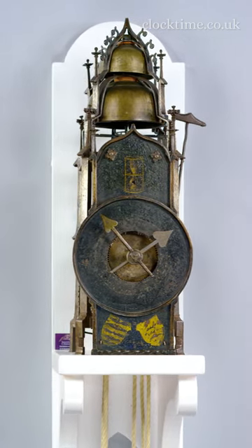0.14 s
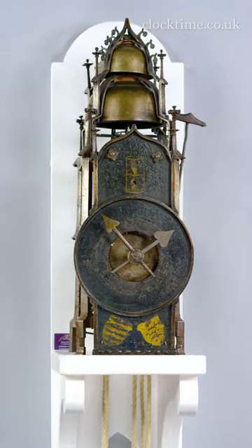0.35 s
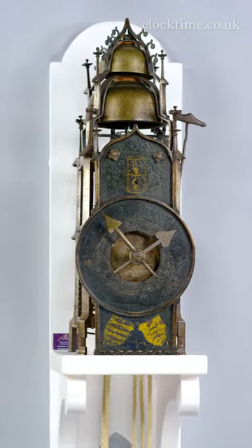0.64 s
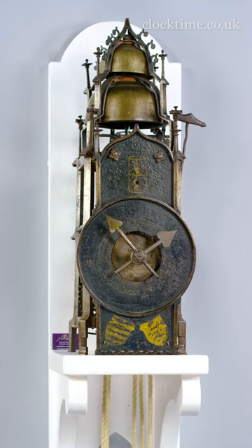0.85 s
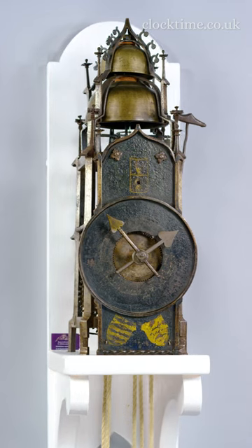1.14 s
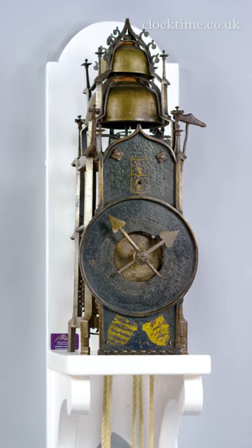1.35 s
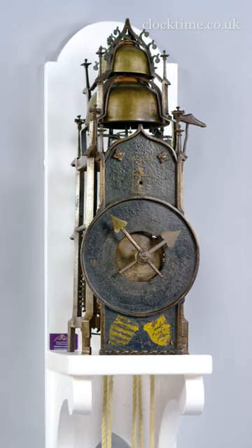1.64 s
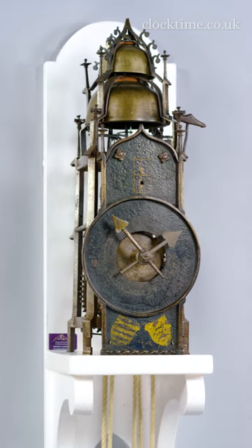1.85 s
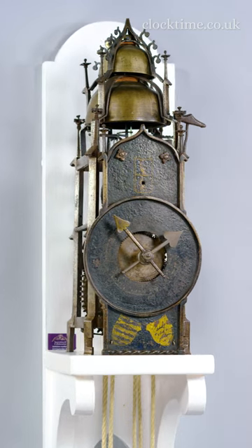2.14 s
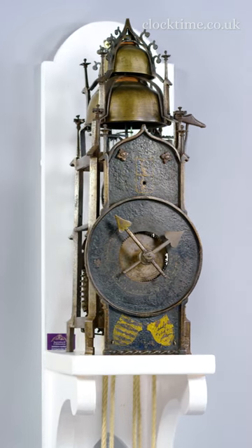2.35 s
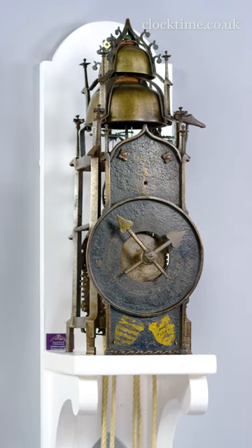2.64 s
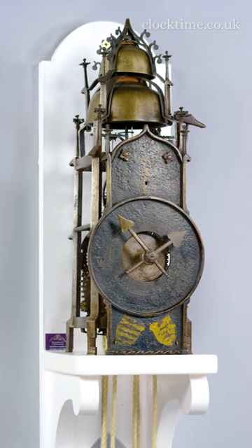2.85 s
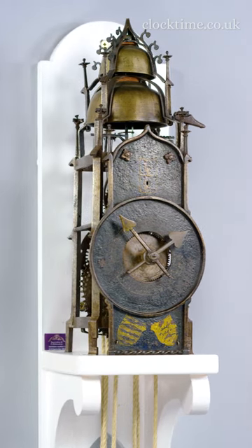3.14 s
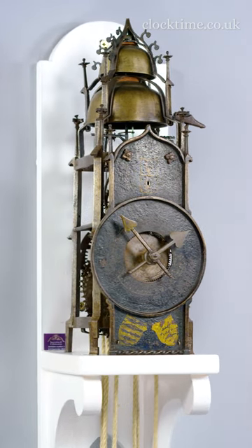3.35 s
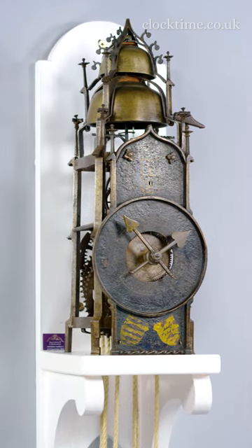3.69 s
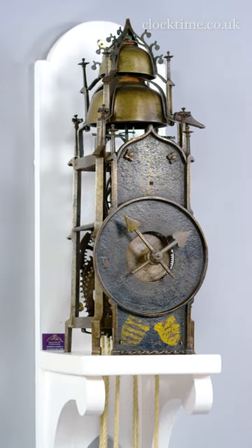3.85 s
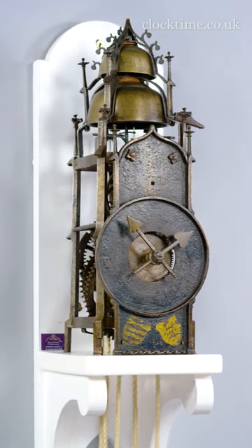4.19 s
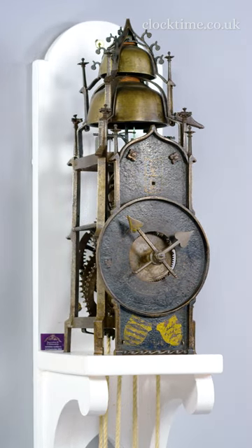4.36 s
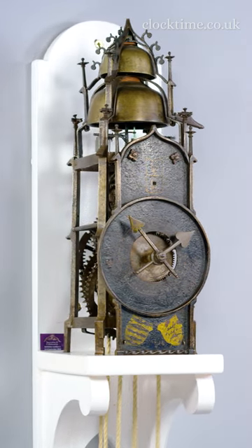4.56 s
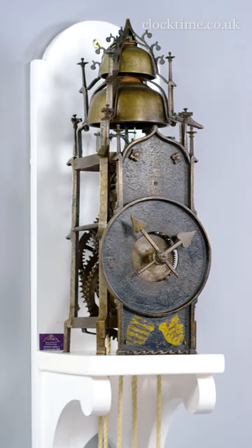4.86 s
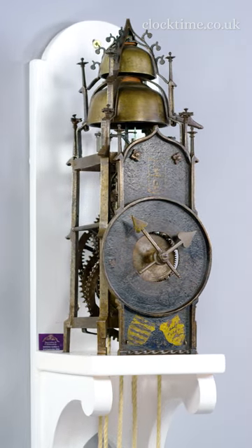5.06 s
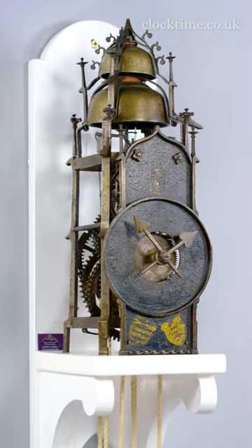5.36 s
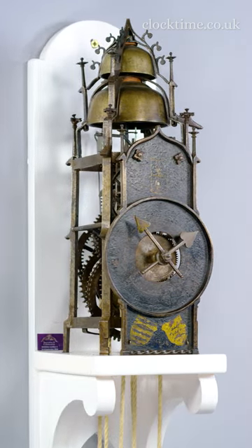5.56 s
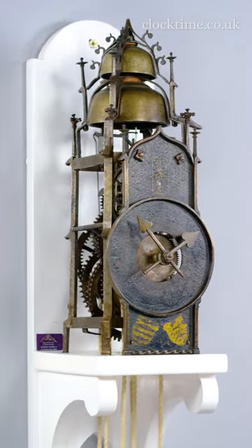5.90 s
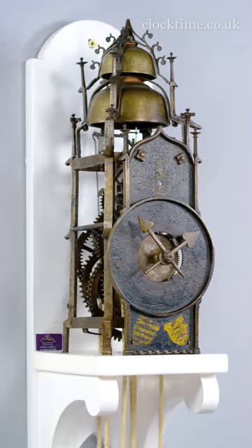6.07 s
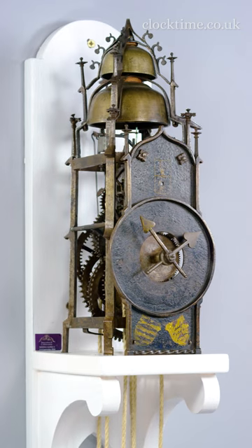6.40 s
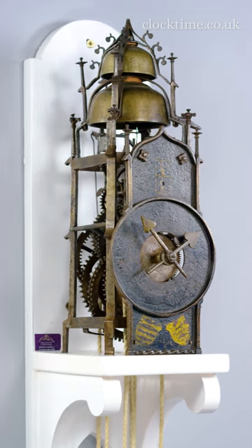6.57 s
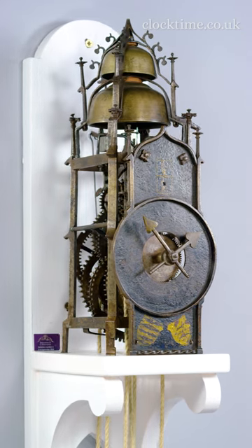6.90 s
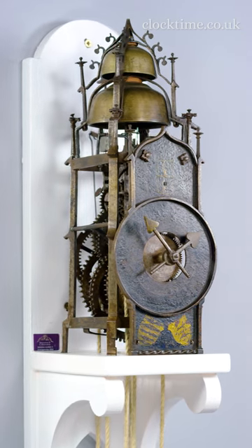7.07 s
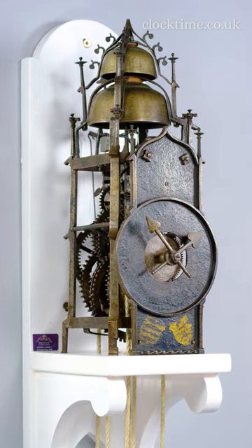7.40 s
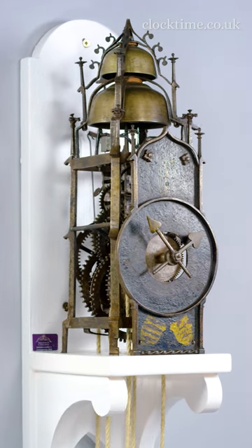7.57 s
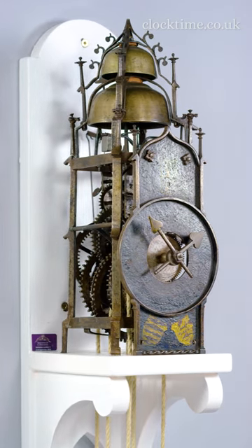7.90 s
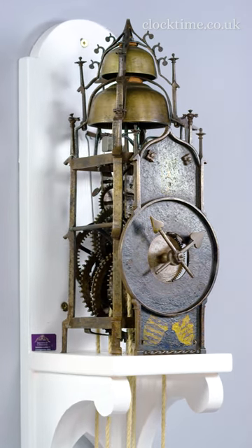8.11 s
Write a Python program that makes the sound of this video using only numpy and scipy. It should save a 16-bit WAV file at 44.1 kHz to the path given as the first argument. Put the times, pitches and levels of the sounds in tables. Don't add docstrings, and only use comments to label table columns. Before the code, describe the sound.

Crisp, bright clock ticks with tiny iron rattles and a soft wooden thud, one per second, over faint fan whine and distant low rumble.

```python
import sys
import numpy as np
from scipy import signal
from scipy.fft import rfft, irfft
from scipy.io import wavfile
from scipy.ndimage import uniform_filter1d

SR = 44100
rng = np.random.default_rng(int(sys.argv[2]) if len(sys.argv) > 2 else 0)


def int16_out(signal):
    q = np.round(np.clip(np.atleast_2d(signal).T, -1, 1) * 32767)
    wavfile.write(sys.argv[1], SR, q.astype(np.int16))


def level_to_linear(level):
    exponent = np.asarray(level, float) / 20
    return 10 ** exponent


N = 363384

# start in seconds, peak in dB, ring of the struck part in Hz, chatter in # ms.
DROPS = [(0.1382, -12, 10000, 5.0), (0.1452, -4, 13900, 6.2), (1.096, -16, 13700, 5.0),
         (1.1029, -23, 10000, 3.6), (2.2716, -17.5, 14800, 3.7), (2.2788, -8.5, 5600, 5.7),
         (2.3051, -20, 14700, 5.0), (3.2267, -13.5, 6630, 7.1), (3.2315, -17.5, 8280, 5.0),
         (4.2334, -15, 10820, 5.5), (4.2404, -10, 10400, 5.7), (5.1471, -13, 9900, 10.2),
         (6.1479, -18.5, 9800, 4.2), (6.1539, -17, 7490, 9), (6.1744, -25.5, 9950, 9),
         (7.1849, -8.5, 7800, 5.0), (7.197, -12, 9940, 2.7), (8.1784, -18.5, 10570, 5.0),
         (8.1829, -14.5, 8856, 5.0), (8.2106, -22, 9750, 5.6)]
# start in seconds, peak in dB, ring of the struck part in Hz.
GRAZES = [
    (1.0933, -25.5, 9020),
    (3.2259, -18.5, 7040),
    (5.1483, -16.5, 6040),
    (7.1839, -10.5, 7570),
]
# start in seconds, shove on the wall in dB, shove on
# the shelf in dB, then how well the knocks of that tick reach the wood in dB and the frame in dB.
PUSH = [(.157, -41, -27, -24, -33), (1.12, -33.5, -58, -30.5, -28.5), (2.287, -32.5, -26.5, -25.5, -31.5),
        (3.244, -38.5, -48.5, -25.5, -28.5), (4.254, -35.5, -23.5, -28, -31.5),
        (5.157, -32.5, -46, -25, -26), (6.182, -35.5, -28.5, -25.5, -31), (7.199, -32.5, -31, -33.5, -32),
        (8.195, -43, -26, -26.5, -32)]
# mode in Hz, level in dB, t60 in seconds.
BRACKET = [(81, 4, 0.21), (92.45, -8.5, 0.19), (156.3, -2, 0.23), (227.4, -1, 0.16), (263.2, 2, 0.2),
           (342.6, -6, 0.11), (395, -5.5, 0.2), (445, -10, .15), (558.7, -5.5, 0.091), (617, -12.5, 0.079),
           (727, -8, 0.1), (830, -18.5, 0.12), (900, -15.5, 0.054)]
SUPPORT_HZ = [85, 150, 250, 600, 1500]


def evened(x):
    return x / np.sqrt(np.mean(x ** 2) + 1e-20)


def read(points, hz):
    f, value = np.transpose(points)
    return np.interp(np.log(hz + 1), np.log(f + 1), value)


def add(mix, s, sound):
    part = mix[round(s * SR):][:len(sound)]
    part += sound[:len(part)]


def coloured(noise, points):
    hz = np.fft.rfftfreq(len(noise), 1 / SR)
    return irfft(rfft(noise) * level_to_linear(read(points, hz)), len(noise))


def ring(hz, db, t60, t, phase=0):
    hz, db, t60, phase = (np.reshape(v, (-1, 1)) for v in (hz, db, t60, phase))
    modes = level_to_linear(db - 60 * t / t60) * np.sin(2 * np.pi * (hz * t + phase))
    return modes.sum(0)


def metal(modes, t):
    damping, spread_db = 2.8, 3
    hz, width, db = np.transpose(modes)
    detune, luck = rng.standard_normal((2, len(hz)))
    short = t[:len(t) // 4]
    sound = ring(hz * (1 + .008 * detune), db + spread_db * luck, 2.2 / (damping * width), short)
    return np.pad(sound, (0, len(t) - len(short)))


def rattle(chatter_ms):
    knocks = rng.uniform(-1, 1, 1500) * (rng.random(1500) < .16)
    late = np.maximum(np.arange(1500) / SR - .0006, 0)
    onset = 1 - np.exp(-(late / .0004) ** 2)
    knocks *= onset * np.exp(-(late * 1000 / np.clip(chatter_ms, .3, 12)) ** 2.2)
    z = rfft(knocks)
    level = np.sqrt(uniform_filter1d(abs(z) ** 2, size=25) + 1e-12)
    return irfft(z / level, 1500) * (np.arange(1500) < 1200)


def driven(sounds, knocks):
    return signal.fftconvolve(sounds, knocks[None], axes=1)[:, :len(sounds[0])]


def iron_tick(peak_db, own_hz, knocks, lower, t):
    # mode in Hz, width in Hz, level in dB.
    iron_modes = [(5260, 100, -2), (5660, 77, -11), (6840, 150, -23.5), (7390, 69, -13), (7400, 78, -6),
                  (8110, 69, -18), (8460, 59, -14), (9170, 86, -12.5), (9750, 37, -1.5), (10400, 42, 2.5),
                  (10984, 200, -18), (11800, 340, 4.5), (13600, 140, -30.5), (13900, 60, -4.5),
                  (14100, 80, 2.5), (14700, 48, -8.5)]
    # frequency in Hz, level in dB per Hz.
    crack_colour = [(350, -62), (600, -10.5), (1440, -13.5), (3710, -8), (4210, -44), (5560, 4), (10100, 4),
                    (12600, 2.5), (13700, 2), (15800, -17), (16700, -41.5)]
    crack = evened(coloured(rng.standard_normal(len(t)), crack_colour))
    crack *= np.exp(-t / 0.00066) + 0.19 * np.exp(-t / 0.0064)
    own_db = 1.5 + max(peak_db + 9, 0)
    parts = metal(iron_modes, t) + ring(own_hz, own_db, .018, t)
    pair = driven([level_to_linear(10.0) * crack, parts], knocks)
    pair = signal.sosfilt(signal.butter(4, 4000, "high", fs=SR, output="sos"), pair)
    crack, parts = (coloured(v, [(9000, 0), (14000, -4.0 * lower)]) for v in pair)
    gain = level_to_linear(peak_db) / abs(crack + parts).max()
    return gain * parts, gain * crack


def frame_ring(frame_db, knocks, lower, share, t):
    # mode in Hz, width in Hz, level in dB.
    frame_modes = [(1216, 33, -8.5), (1780, 32, -24), (1990, 31, -9.5), (2110, 20, -0.5), (2230, 340, 5),
                   (2610, 35, -12.5), (3191, 44, -18.5), (3380, 190, 9.5), (3760, 80, 13), (4080, 56, -12),
                   (4460, 41, 6), (4766, 16, -14.5)]
    # mode in Hz, level in dB, t60 in seconds.
    pallet_modes = [
        [(2968, 9.5, 0.059), (3355, 5, 0.037)],
        [(3690, 11.5, 0.03), (2397, 0, 0.061)],
    ]
    # frequency in Hz, level in dB per Hz.
    wash_colour = [(400, -28), (800, -4.5), (1500, -2), (2400, 0), (3600, -3), (4300, -14.5), (5200, -3),
                   (7000, -21)]
    wash = coloured(coloured(rng.standard_normal(len(t)), wash_colour), share)
    wash = level_to_linear(13.5) * evened(wash) * (np.exp(-t / 0.0029) + .1 * np.exp(-t / 0.042))
    frame = metal(frame_modes, t) + ring(*np.transpose(pallet_modes[lower]), t)
    wake = 1 - np.exp(-(t / .0014) ** 2)
    wash, frame = driven([wash * wake, frame * wake], knocks)
    gain = level_to_linear(frame_db + 8.5) / abs(wash + frame).max()
    return gain * frame, gain * wash


def reach_db(s, peak_db, tick_db, follow, touch_db, seating_s):
    first = min(row[0] for row in DROPS + GRAZES if abs(row[0] - s) < .3)
    return tick_db + follow * (peak_db + 15.5) + touch_db * np.exp(-(s - first) / seating_s)


def wood_modes(db, t, wake_turns):
    hz, _, t60 = np.transpose(BRACKET)
    phase = .06 * rng.standard_normal(len(hz))
    out = np.zeros(len(t))
    for f, level, decay, turn in zip(hz, db, t60, phase):
        out += (1 - np.exp(-t * f / wake_turns)) * ring(f, level, decay, t, turn)
    return out


def contact(s, peak_db, own_hz, chatter_ms):
    # posts in dB, plate in dB.
    rap_colour = [
        (4, -0.5),
        (8.5, 5.5),
    ]
    t = np.arange(round(.3 * SR)) / SR
    tick = np.argmin([abs(row[0] - s) for row in PUSH])
    lower = tick % 2
    share = list(zip([*SUPPORT_HZ, 2600], [-9.0, -7.0, -5.0, *rap_colour[lower], 0]))
    rap_db = reach_db(s, peak_db, PUSH[tick][3], follow=.6, touch_db=-12.5, seating_s=.005)
    frame_db = reach_db(s, peak_db, PUSH[tick][4], follow=0.96, touch_db=-9, seating_s=.004)
    knocks = rattle(chatter_ms)
    parts, crack = iron_tick(peak_db, own_hz, knocks, lower, t)
    frame, wash = frame_ring(frame_db, knocks, lower, share, t)
    hz, db, _ = np.transpose(BRACKET)
    rap = wood_modes(rap_db - 6.0 + db + read(share, hz), t, wake_turns=.9)
    return parts + frame, crack + wash, rap


def contacts():
    # start in seconds, peak in dB, ring of the struck part in Hz.
    bounces = [(0.1654, -19.5, 8600), (0.1698, -19, 8440), (0.1892, -36, 13900), (1.1232, -28.5, 6300),
               (1.1352, -35, 10200), (2.2961, -23, 6180), (2.3109, -26, 14700), (2.3212, -42, 10300),
               (2.3269, -33, 10300), (3.2434, -28.5, 8630), (3.261, -34, 6130), (4.2632, -21.5, 10200),
               (4.2692, -27.5, 8570), (5.1617, -27, 7300), (5.1774, -35, 7510), (5.1885, -36.5, 6360),
               (6.185, -55, 10400), (7.2062, -25.5, 9900), (7.2256, -26.5, 7650), (8.2042, -23.5, 9200),
               (8.2176, -28, 10400)]
    bounce_ms, graze_ms = 4.7, 0.96
    rows = DROPS + [(*row, bounce_ms) for row in bounces] + [(*row, graze_ms) for row in GRAZES]
    tracks = np.zeros((3, N))
    for row in rows:
        for track, sound in zip(tracks, contact(*row)):
            add(track, row[0], sound)
    return tracks


def shove(wall_db, shelf_db):
    hz, db, _ = np.transpose(BRACKET)
    board_db = wall_db - 4.5
    support_db = [wall_db, board_db, shelf_db, shelf_db - 15.5, shelf_db - 29.5]
    push_db = read(list(zip(SUPPORT_HZ, support_db)), hz)
    t = np.arange(round(.4 * SR)) / SR
    return wood_modes(push_db + db * (hz > 200), t, wake_turns=0.59)


def slip(peak_db, hz, length_ms):
    t = np.arange(round(.06 * SR)) / SR
    band = [(hz * .5, -70), (hz * .8, -6), (hz, 0), (hz * 1.3, -6), (hz * 1.8, -70)]
    scrape = evened(coloured(rng.standard_normal(len(t)), band))
    return level_to_linear(peak_db - 13.0) * scrape * np.exp(-((t - .02) * 2000 / length_ms) ** 2)


def gear_slips():
    # middle of the swell in seconds, peak in dB, pitch in Hz, length in ms.
    slip_events = [
        (0.11, -60, 7300, 22),
        (1.486, -61.5, 8900, 20),
        (2.841, -63.5, 5000, 10),
        (4.209, -54, 10500, 5),
        (8.16, -59.5, 5000, 38),
        (2.689, -61.5, 90, 30),
        (7, -40, 400, 18),
        (4.7, -61, 2700, 17),
    ]
    out = np.zeros(N)
    for s, *row in slip_events:
        add(out, s - .02, slip(*row))
    return out


def room(x):
    # frequency in Hz, t60 in seconds.
    room_decay = [(100, .3), (400, 0.23), (1200, .45), (3000, .45), (7000, 0.36), (11000, .33),
                  (16000, 0.47)]
    out, turn = np.zeros(N), np.arange(N) / SR * 1.3
    for k in range(3):
        taps = np.zeros(SR // 2)
        at = np.arange(200, SR // 2 - 12, 12)
        taps[at + rng.integers(0, 12, len(at))] = rng.choice([-1., 1.], len(at))
        hz, t, z = signal.stft(taps, SR, nperseg=256)
        fade = level_to_linear(-60 * t / read(room_decay, hz)[:, None])
        tail = signal.istft(z * fade, SR, nperseg=256)[1]
        share = np.sqrt(2 / 3) * np.cos(np.pi * (turn + k / 3))
        out += signal.fftconvolve(x * share, tail / np.linalg.norm(tail))[:N]
    return out


def fan():
    # time in seconds, pitch in Hz, level in dB.
    whine = [(0, 762, -66.5), (1.6, 772, -67), (2.2, 776, -63), (2.6, 776.3, -71.5), (4, 788, -74),
             (5.4, 787, -74.5), (5.8, 773.4, -67.5), (6.3, 773.5, -63), (6.999, 761, -66.5),
             (8.24, 776, -67)]
    # frequency in Hz, level in dB.
    motor_lines = [(440, -71.5), (553, -87.5), (612, -88), (1168, -80.5), (1200, -78.5), (1301, -84),
                   (1588, -87), (1630, -88), (1658, -88), (1687, -83.5), (1715, -85.5), (1744, -85),
                   (1758, -84), (1772, -84.5), (1805, -87), (1829, -89), (1858, -86)]
    t = np.arange(N) / SR
    s, hz, db = np.transpose(whine)
    turns = np.cumsum(np.interp(t, s, hz)) / SR
    out = level_to_linear(np.interp(t, s, db)) * np.sin(2 * np.pi * turns)
    for hz, db in motor_lines:
        waver_db = 2.1 * np.interp(t, np.linspace(0, t[-1], 30), rng.standard_normal(30))
        out += level_to_linear(db + waver_db) * np.sin(2 * np.pi * (hz * t + rng.random()))
    return np.sqrt(2) * out


def air():
    # frequency in Hz, level in dB per Hz.
    air_colour = [(15, -18.5), (45, -1), (95, 4.5), (150, -14), (220, -5), (320, -8.5), (550, -5.5),
                  (700, -12), (1180, -11), (1450, -14), (1750, -13.5), (2200, -20), (5000, -25),
                  (16000, -31.5)]
    # peak time in seconds, rise over the bed in dB, length in seconds.
    rumble = [(.85, 13.5, .3), (1.554, 7.5, .25), (1.982, 8, .08), (2.19, 10, .1), (2.69, 15.5, .12),
              (3.02, 6.5, .1), (3.6, 5, .2), (3.93, 7, 0.23), (4.15, 12, .1), (4.6, 12.5, .3),
              (5.1, 8, 0.28), (5.45, 4.5, .2), (6.05, 10.5, .25), (6.55, 8, 0.33), (7.12, 7.5, .25),
              (7.6, 9.5, 0.22), (7.95, 10, .25), (8.1, 13, .1)]
    air_db, rumble_bed_db = -61, -8.5
    frames, hz = N // 512 + 6, np.fft.rfftfreq(2048, 1 / SR)
    a, b, patches = rng.standard_normal((frames, 1025, 3)).T
    patches = evened(uniform_filter1d(uniform_filter1d(patches, 5, 0), 10, 1))
    lumpy_db = read([(60, 1.7), (300, 6.6), (2000, .8), (8000, .3)], hz)[:, None] * patches
    t = np.arange(frames) * 512 / SR
    swells = [db * np.exp(-(2 * (t - s) / length) ** 2) for s, db, length in rumble]
    rumble_db = rumble_bed_db + np.max(swells, 0)
    level_db = read(air_colour, hz)[:, None] + lumpy_db + (hz < 120)[:, None] * rumble_db
    noise = signal.istft((a + 1j * b) * level_to_linear(level_db), nperseg=2048, noverlap=1536)[1][:N]
    return level_to_linear(air_db) * evened(noise)


def scene():
    ringing, diffuse, wood = contacts()
    for s, wall_db, shelf_db, *_ in PUSH:
        add(wood, s, shove(wall_db, shelf_db))
    diffuse = diffuse + gear_slips()
    wood = signal.sosfilt(signal.butter(5, 62, "high", fs=SR, output="sos"), wood)
    answer = room(level_to_linear(-28.5) * ringing + level_to_linear(-18.5) * diffuse + level_to_linear(-5.0) * wood)
    return (ringing + diffuse + wood + answer + air() + fan())[None]


def hum_filter(x):
    for k in range(1, 9):
        x = signal.lfilter(*signal.iirnotch(k * 60, 7.0, SR), x)
    return x


def low_pass(x, taps, cutoff_hz):
    fir = signal.firwin(taps, cutoff_hz, window=("kaiser", 9), fs=SR)
    return signal.oaconvolve(x, fir[None], "same")


def pre_hiss(x):
    ahead = np.sqrt(abs(uniform_filter1d(x ** 2, 800, origin=-399)))
    hiss = coloured(rng.standard_normal(N), [(1500, -20), (3000, -0.5), (15600, -1.5), (15900, -58)])
    return level_to_linear(-40.5) * ahead * evened(hiss)


def top_cut(x):
    return signal.sosfilt(signal.butter(12, 16840, fs=SR, output="sos"), x)


def record(dry):
    x = hum_filter(dry)
    narrow, wide = low_pass(x, 511, 15850), low_pass(x, 161, 15950)
    loud_db = 10 * np.log10(abs(uniform_filter1d(x ** 2, 300)) + 1e-14)
    opening = np.clip((loud_db + 46) / 15, 0, 1)
    mix = narrow + (wide - narrow) * opening + pre_hiss(narrow)
    return top_cut(mix)


dry = scene()
out = record(dry)
int16_out(out)
```